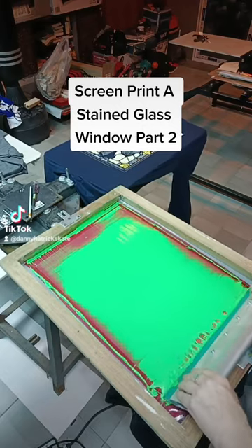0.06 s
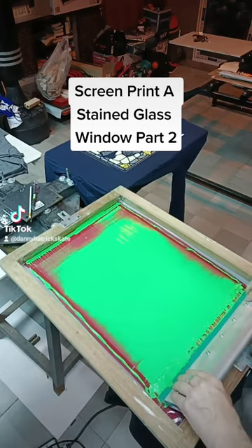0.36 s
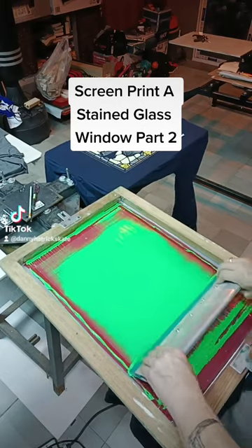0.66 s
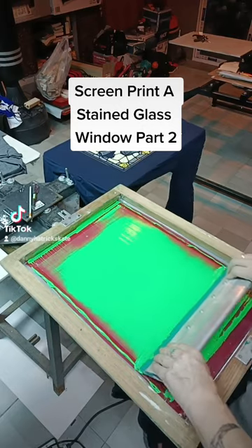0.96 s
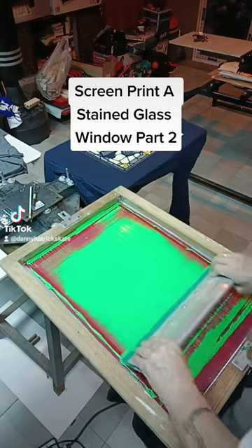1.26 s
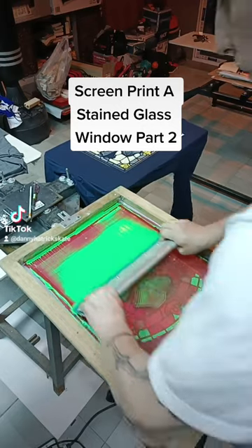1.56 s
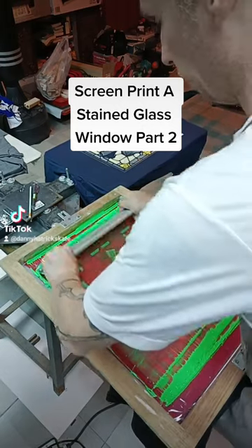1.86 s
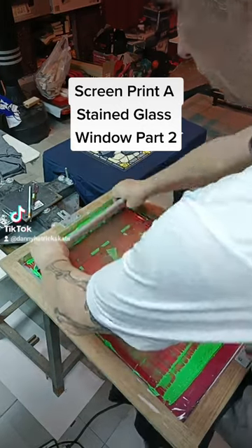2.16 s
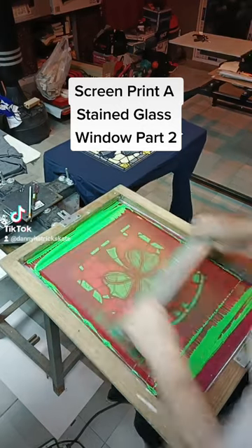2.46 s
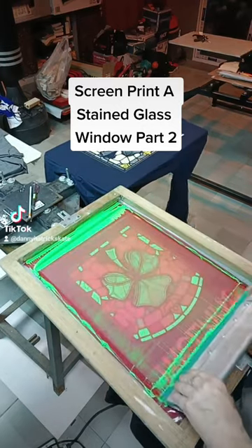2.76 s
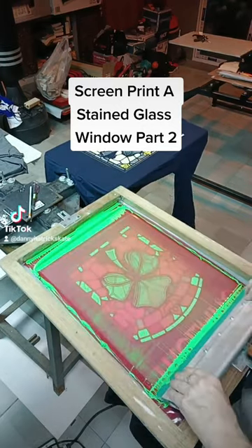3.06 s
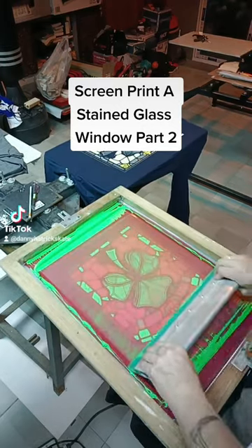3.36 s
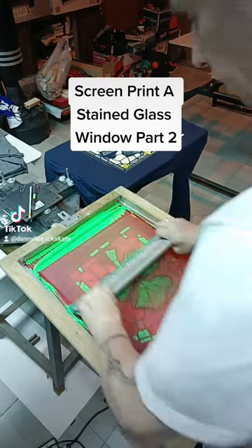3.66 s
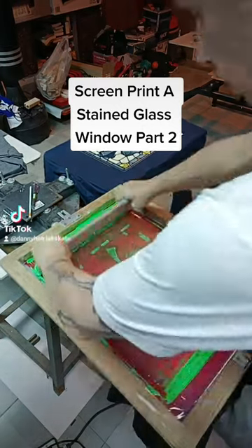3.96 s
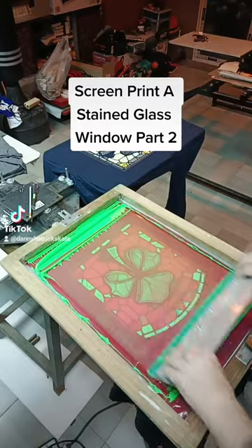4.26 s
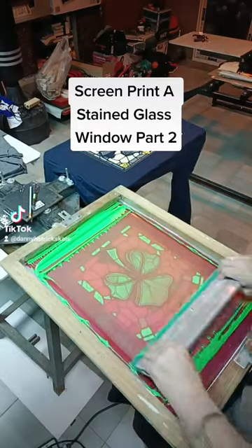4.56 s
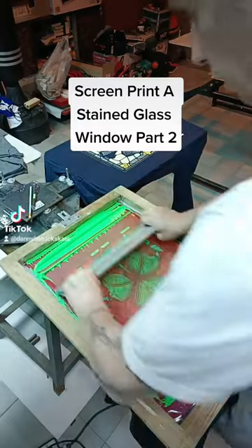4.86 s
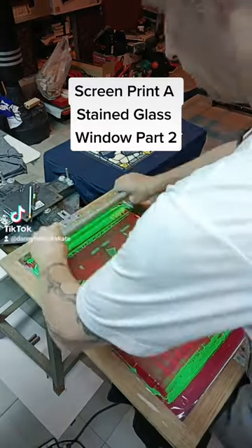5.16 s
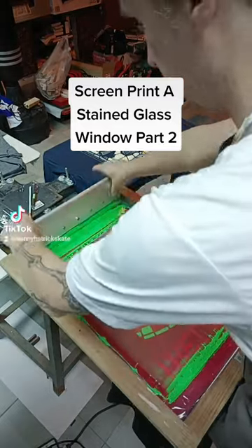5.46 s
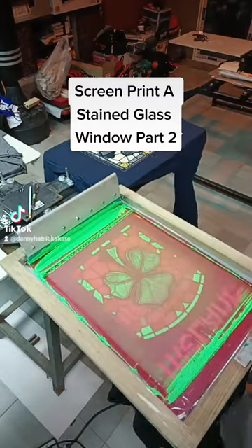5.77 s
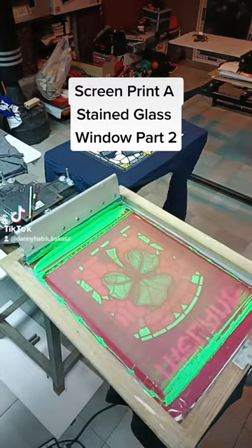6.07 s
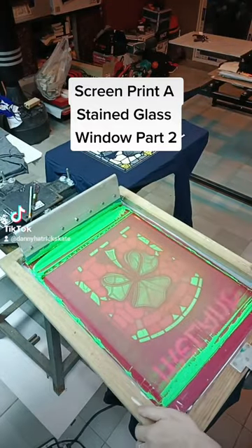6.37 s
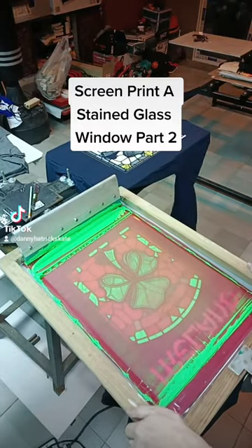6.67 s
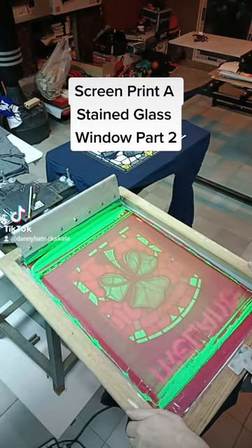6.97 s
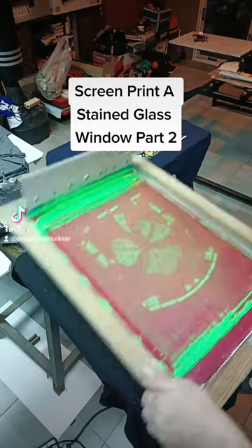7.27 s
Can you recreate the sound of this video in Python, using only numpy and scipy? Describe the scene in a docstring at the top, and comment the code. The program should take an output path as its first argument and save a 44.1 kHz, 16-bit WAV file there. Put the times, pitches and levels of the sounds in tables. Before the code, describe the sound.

A squeegee zips and rasps across an inked printing screen, with wet crackles and wooden knocks over a low ventilation drone.

```python
"""Squeegee on a printing screen

A workshop, with a phone's stereo microphone by the inked screen: short scuffs, four brief rubs, three
long pulls. The blade edge plucks the mesh threads, so each stroke zips at a pitch that follows its
speed, while wet ink crackles and snaps. The blade peels off and knocks on the wooden frame, its metal
holder ticks and the screen thuds softly. Ventilation drones in the background."""
import sys
import numpy as np
from scipy import signal
from scipy.fft import rfft, irfft
from scipy.io import wavfile
from scipy.ndimage import uniform_filter1d, map_coordinates

SR = 44100
rng = np.random.default_rng(int(sys.argv[2]) if len(sys.argv) > 2 else 0)


def dump_mix(stems):
    """Bounce the given channels to the path in sys.argv[1] as a 16-bit WAV at rate SR."""
    frames = np.atleast_2d(stems).T  # one column per channel
    limited = np.clip(frames, -1, 1)  # hard clip at full scale
    pcm = np.round(limited * 32767).astype(np.int16)
    wavfile.write(sys.argv[1], SR, pcm)


N = 326340
TIME = np.arange(N) / SR
USUAL_HZ = 1670  # threads crossed per second at the usual blade speed

# spectrum of wet ink crackling: f/Hz, level/dB
INK_SPECTRUM = [(100, -36.5), (800, 4), (2500, -0.5), (4000, 0.5), (7000, -10), (9000, -23.5),
                (10300, -16.5), (11500, -35.5), (13200, -16), (15000, -22)]
# spectrum of peeling ink and of contact cracks: f/Hz, level/dB
CRACK_SPECTRUM = [(30, -32.5), (100, -8), (1000, -1), (2300, -2.5), (3300, 3), (4200, -1.5), (6500, -13.5),
                  (9000, -32), (15000, -41.5)]


def undb(db):
    """Decibels to gain."""
    return 10 ** (np.asarray(db) / 20)


def unit(x):
    """Scale to rms 1."""
    return x / np.sqrt(np.mean(x ** 2))


def colour(x, points, size=8192):
    """Filter by an outline (f/Hz, level/dB), with minimum phase so that attacks stay sharp."""
    hz, db = np.transpose(points)
    bin_hz = np.arange(size // 2 + 1) * SR / size
    gain = undb(np.interp(np.log(bin_hz + 1), np.log(hz), db))
    cepstrum = irfft(np.log(gain))
    cepstrum[1:size // 2] *= 2
    cepstrum[size // 2 + 1:] = 0
    response = irfft(np.exp(rfft(cepstrum)))
    return signal.oaconvolve(x, np.array(response, ndmin=x.ndim), axes=-1)[..., :x.shape[-1]]


def walk(rate, size, order=16):
    """Smooth random wander of spread about 1, with rate new values a second."""
    samples = np.arange(0, size + order, order)
    coarse = map_coordinates(rng.standard_normal(len(samples)), [samples * rate / SR], order=3, mode="wrap")
    return np.interp(np.arange(size), samples, coarse)


def add(track, s, sound):
    """Mix a sound into a stereo track at time s."""
    start = int(s * SR)
    sound, start = sound[..., max(-start, 0):], max(start, 0)
    track[:, start:start + sound.shape[-1]] += sound[..., :N - start]


def swell(rise_s, fall_s, fade_db=18, roundness=1.32):
    """Time from the peak, and gain, of a gesture that is fade_db down at -rise_s and at fall_s."""
    t = np.arange(-2 * rise_s, 2 * fall_s, 1 / SR)
    return t, undb(-fade_db * np.maximum(-t / rise_s, t / fall_s) ** roundness)


def port_lag(hz, lag_s=0.000367):
    """Cycles by which the left microphone port lags: almost none in the bass, levelling off in the treble."""
    return np.array([[lag_s], [0]]) * np.minimum(hz, 4600) * np.minimum(hz / 2500, 1) ** 1.48


def burst(envelope, points, scatter=1.67):
    """Shaped noise at the microphone: a direct part, and a part scattered differently to each port."""
    size = len(envelope)
    hz = np.arange(size // 2 + 1) * SR / size
    source = envelope * rng.standard_normal(size)
    direct = irfft(rfft(source) * np.exp(-2j * np.pi * port_lag(hz)), size)
    scattered = scatter * envelope * rng.standard_normal((2, size))
    return colour(direct + scattered, points)


def crackle(points, spread_db, size):
    """Dense tiny ruptures, a few much larger than the rest."""
    strength = undb(spread_db * np.minimum(rng.exponential(size=size), 7))
    return unit(burst(strength, points))


def ventilation(drone_db=-49, air_db=-60):
    """Room tone: a low ventilation drone, partly alike at both ports, under diffuse air noise."""
    # spectra of the drone and of the air: f/Hz, level/dB
    drone_spectrum = [(20, -32), (60, -15), (105, -7.5), (138, 1.5), (182, 5), (230, 8.5), (275, -4),
                      (330, -4.5), (400, -10), (550, -16.5), (900, -39), (3000, -79.5)]
    air_spectrum = [(40, -22.5), (300, 4.5), (800, 5.5), (1700, -5.5), (3200, -9.5), (4500, -25.5),
                    (7000, -34.5), (11500, -50), (12800, -32), (15000, -31.5)]
    common = rng.standard_normal(N)
    diffuse = colour(rng.standard_normal((2, N)), [(50, -6.0), (150, -6.0), (300, 7.0), (600, -17.5)])
    drone = unit(colour(common + diffuse, drone_spectrum))
    air = unit(colour(rng.standard_normal((2, N)), air_spectrum))
    return drone * undb(drone_db + 1.76 * walk(6, N)) + air * undb(air_db)


def frame_knocks(track):
    """The squeegee knocks on the wooden frame: a contact crack and a short ring."""
    # knocks: t/s, level/dB, crack gain/dB
    knocks = [(.002, -52.5, -12), (3.497, -48, 2), (4.082, -42, 5.5), (5.263, -49.5, 14.5),
              (5.488, -41, -16)]
    # modes of frame and squeegee: f/Hz, level/dB, t60/s
    modes = [(392, 10, 0.0069), (800, -6, 0.038), (1053, 13, 0.0094), (1450, 0.5, 0.018)]
    t = TIME[:SR // 5]
    ring = sum(undb(db) * np.sin(2 * np.pi * hz * t) * undb(-60 * t / t60) for hz, db, t60 in modes)
    contact = 1 - np.exp(-t / 0.00098)  # wood and rubber meet softly
    for s, db, crack_db in knocks:
        crack = burst(np.exp(-t / 0.0033), CRACK_SPECTRUM)
        add(track, s, undb(db) * contact * (1.73 * ring + 3.0 * undb(crack_db) * crack))


def mesh_zip(t, hz, skew_hz, second_db, rasp_db, trail_s, flicker_hz, third_db=-24.0, patches=7):
    """Patches along the blade cross the threads at slightly different speeds and sum to a rough whistle."""
    # spectrum of the rubber's rasp: f/Hz, level/dB
    rasp_spectrum = [(150, -14.5), (450, -3), (780, 2), (1500, 1), (2400, -5.5), (3400, -7), (4300, -29.5),
                     (7000, -41.5), (15000, -61.5)]
    # resonances of the stretched screen: f/Hz, level/dB
    screen_response = [(640, -0.5), (785, 0.5), (920, -3.5), (1070, 3.5), (1280, -4), (1750, 3), (2700, -4),
                       (3200, 0.5), (4000, -1.5)]
    n, whistle = len(t), 0
    octaves_per_s = np.abs(uniform_filter1d(np.gradient(np.log2(hz)) * SR, SR // 20))
    skid = np.minimum(octaves_per_s / 11.5, 1)  # the blade skids as it speeds up or brakes
    skid_db = 2 * skid  # it then rasps more and plucks less cleanly
    for place in np.linspace(-1, 1, patches):
        # one end of the blade trails the other, so the whistle turns raspy whenever the speed changes
        rate = np.interp(t + trail_s * place, t, hz) + skew_hz * place + 45 * walk(500, n)
        cycles = np.cumsum(rate) / SR
        # each patch has its own path to the two ports, which matters less for low tones
        path = 0.3 * np.minimum(rate / USUAL_HZ, 1) * np.array([walk(24.91, n) for _ in range(2)])
        for k, db in enumerate((0, second_db - skid_db, third_db), 1):
            gain = undb(db) / np.sqrt(1 + (k * rate / 4000) ** 8)  # soft rubber dulls the high partials
            phase = k * cycles - port_lag(k * rate) + path + rng.random()
            whistle = whistle + gain * walk(flicker_hz, n) * np.sin(2 * np.pi * phase)
    chatter = 1 + 0.32 * skid * walk(446.2, n)  # smears each partial into a rough band
    rasp = undb(rasp_db + skid_db) * (USUAL_HZ / hz) ** 0.15 * crackle(rasp_spectrum, 1.6, n)
    rub = unit(whistle * chatter) + rasp
    power = uniform_filter1d(np.mean(rub ** 2, axis=0), SR // 60)
    steady = rub / np.sqrt(power)  # the hand keeps the pressure steady
    grip = undb(1.6 * walk(134.6, n))
    return colour(steady, screen_response) * grip


def wet_ink(size, breaks_per_s=55, break_s=0.00057):
    """Wet ink crackles under the blade; now and then a larger string of ink breaks."""
    hiss = crackle(INK_SPECTRUM, 2.6, size) * undb(2.9 * walk(120, size))
    breaks = (rng.random(size) < breaks_per_s / SR) * rng.uniform(0.15, 1, size)
    ticks = signal.lfilter([1], [1, -np.exp(-1 / (break_s * SR))], breaks)
    return hiss * (1 + 3.0 * ticks)


def blade_scuffs(track, bend_s=0.04):
    """Short raspy strokes with the blade askew; the pitch bends as the hand speeds up or slows down."""
    # scuffs: peak t/s, rise/s, fall/s, f/Hz, bend each side of f/octaves, spread along the blade/Hz,
    # second partial/dB, zip level/dB, rasp/dB, ink hiss/dB
    scuffs = [ (0.008, 0.016, 0.038, 379, 0.13, 119.3, 0.5, -42.5, -12.5, -89),
              (0.04, 0.019, 0.034, 1228, 0.18, 40, -3.5, -41.5, -8.5, -71),
              (0.37, 0.038, 0.036, 1378, -0.4, 132, -8, -41.5, -5.5, -61.5),
              (0.54, 0.055, 0.15, 749, 0.05, 119.7, -24, -54.5, -4, -76),
              (1.094, 0.015, 0.048, 1612, -0.7, 37.3, 0, -40, -31, -55),
              (1.255, 0.017, 0.04, 1570, -0.15, 35, 0.5, -32.5, -21.5, -60),
              (2.885, 0.055, 0.13, 903, -0.22, 109.8, -6.5, -50, -8.5, -72),
              (3.2, 0.019, 0.063, 938, 0.09, 200.5, -12, -43.5, -6, -69), ]
    for s, rise_s, fall_s, hz, bend, skew_hz, second_db, zip_db, rasp_db, ink_db in scuffs:
        t, gain = swell(rise_s, fall_s)
        pitch = hz * 2 ** (bend * np.tanh(t / bend_s))
        mesh = mesh_zip(t, pitch, skew_hz, second_db, rasp_db, trail_s=0.0072, flicker_hz=161.0)
        add(track, s + t[0], gain * (undb(zip_db) * mesh + undb(ink_db) * wet_ink(len(t))))


def blade_pulls(track, ink_db_per_octave=7.5):
    """Rubs and long pulls with the blade square on: the mesh zips, and a faster blade tears more ink."""
    # one list of points per stroke: t/s, thread-crossing f/Hz, zip level/dB
    pulls = [
        [(0.241, 1406, -54), (0.262, 1843, -42.5), (0.277, 1889, -33.5), (0.298, 1530, -41.5),
         (0.318, 1750, -47), (0.35, 1535, -56)],
        [(0.605, 782, -50.5), (0.626, 891, -44.5), (0.643, 1153, -42.5), (0.668, 1076, -45), (0.69, 965, -37),
         (0.72, 694, -41.5), (0.752, 894, -41), (0.772, 720, -67)],
        [(1.232, 798, -42.5), (1.272, 1407, -44), (1.322, 1289, -41), (1.336, 1009, -37.5), (1.394, 1689, -43),
         (1.43, 1465, -49.5), (1.49, 1389, -41.5), (1.547, 1300, -49.5), (1.61, 1721, -42.5),
         (1.655, 1470, -40.5), (1.722, 1441, -35.5), (1.78, 1493, -42.5), (1.826, 1606, -39.5),
         (1.892, 1381, -40.5), (1.935, 1475, -43), (1.968, 1202, -39.5), (2.014, 972, -42.5),
         (2.044, 673, -48.5)],
        [(2.293, 941, -47), (2.319, 1046, -34.5), (2.332, 1124, -31.5), (2.342, 1450, -29), (2.364, 1495, -38),
         (2.383, 1478, -46), (2.436, 1567, -67)],
        [(3.277, 960.6, -52), (3.294, 942, -40), (3.33, 790, -41.5), (3.366, 783, -42.5), (3.383, 990, -39),
         (3.439, 842, -50.5)],
        [(3.5, 1282, -53), (3.595, 1728, -51), (3.656, 1670, -48.5), (3.695, 1893, -48.5), (3.76, 1777, -46),
         (3.82, 2129, -40), (3.882, 2158, -40), (3.953, 1700, -41.5), (3.974, 1102, -40), (4.002, 832, -32.5),
         (4.04, 722.5, -50)],
        [(4.55, 625, -45.5), (4.597, 1021, -36), (4.606, 1035, -28), (4.622, 1150, -39), (4.69, 1333, -36.5),
         (4.725, 1834, -36), (4.75, 2290, -33.5), (4.778, 2485, -39), (4.828, 2290, -42.5), (4.88, 2508, -38),
         (4.916, 2304, -40.5), (4.948, 2555, -37.5), (4.984, 2350, -43.5), (5.026, 1796, -30),
         (5.06, 1336, -35), (5.115, 1057, -36), (5.134, 810, -34), (5.15, 812, -46.5), (5.184, 795, -57)],
    ]
    # how the blade bears on each: spread along it/Hz, second partial/dB, rasp/dB, hiss at usual speed/dB
    pressures = [(60, -10, -9.5, -71.5), (75.06, -8, -15, -63.5), (21.99, -8, -19.5, -63.5),
                 (39.6, -10, -9.5, -63.5), (60, -11.5, -16.5, -67), (21.99, -6, -21, -64),
                 (27.92, -10.5, -24, -62)]
    for points, (skew_hz, second_db, rasp_db, ink_db) in zip(pulls, pressures):
        s, hz, db = np.transpose(points)
        t = np.arange(s[0], s[-1], 1 / SR)
        judder = 1 + 0.0116 * walk(28.21, len(t))  # the rubber catches and slips
        pitch = np.interp(t, s, hz) * judder
        mesh = mesh_zip(t, pitch, skew_hz, second_db, rasp_db, trail_s=0.014, flicker_hz=124.8)
        hiss = wet_ink(len(t)) * undb(ink_db + ink_db_per_octave * np.log2(pitch / USUAL_HZ))
        contact = np.clip(np.minimum(t - s[0], s[-1] - t) / 0.0024, 0, 1)
        add(track, s[0], contact * (mesh * undb(np.interp(t, s, db)) + hiss))


def bubble_snaps(track, pivot_hz=5960):
    """Ink bubbles snap, each over in a few milliseconds; smaller ones are brighter."""
    # snaps: t/s, level/dB, tilt about the pivot/(dB per octave)
    snaps = [(0.728, -32, 7.5), (1.4606, -31, 1.5), (1.8218, -31.5, 0.5), (1.8901, -35, 3),
             (1.9734, -27.5, -2.5), (2.815, -46.5, -1), (3.031, -39.5, 2), (3.392, -44, 11),
             (3.493, -36, 0), (3.643, -29.5, 0.5), (3.6737, -33.5, -2), (3.777, -32.5, -1),
             (3.9885, -36.5, -4.5), (4.054, -34.5, 2.5), (4.638, -38, 9), (4.8, -28.5, 0),
             (4.862, -30.5, 0), (4.935, -33, -1.5), (5.0685, -35, 0), (5.1591, -37.5, 5),
             (5.1937, -30.5, 1.5)]
    t = TIME[:SR // 30]
    envelope = np.minimum(t / 0.0023, 1) * (np.exp(-t / 0.0011) + 0.16 * np.exp(-t / 0.0082))
    for s, db, tilt in snaps:
        spectrum = [(hz, level + tilt * np.log2(hz / pivot_hz)) for hz, level in INK_SPECTRUM]
        add(track, s, undb(db) * burst(envelope, spectrum))


def ink_peels(track):
    """Strings of sticky ink tear as the blade or the mesh lifts."""
    # peels: peak t/s, rise/s, fall/s, level/dB
    peels = [(1.102, 0.0092, 0.093, -51), (4.08, 0.028, 0.018, -44.5), (5.196, .007, 0.11, -43),
             (7.13, 0.069, 0.13, -72.5)]
    for s, rise_s, fall_s, db in peels:
        t, gain = swell(rise_s, fall_s)
        tearing = crackle(CRACK_SPECTRUM, 0.65, len(t))
        add(track, s + t[0], tearing * gain * undb(db + 1.2 * walk(148, len(t))))


def screen_thuds(track):
    """The whole screen thuds softly as weight lands on it or leaves it, alike at both ports."""
    # thuds: peak t/s, level/dB
    thuds = [(1.111, -54), (2.305, -58), (5.917, -55), (6.29, -53), (6.801, -50.5)]
    # their dull spectrum: f/Hz, level/dB
    spectrum = [(25, -13), (60, -5), (110, -2.5), (200, 9.5), (330, 1.5), (600, -22), (2500, -84)]
    t, gain = swell(rise_s=0.021, fall_s=0.069)
    for s, db in thuds:
        push = unit(colour(rng.standard_normal(len(t)), spectrum))
        add(track, s + t[0], undb(db) * gain * push)


def ink_beads(track):
    """The blade squelches through thick beads of ink, each a brief surge of crackle."""
    # beads: peak t/s, level/dB
    beads = [(1.305, -50), (1.485, -55.5), (1.832, -65), (1.895, -54), (1.962, -51.5), (3.404, -58.5),
             (3.61, -53.5), (3.81, -64), (3.925, -56), (4.657, -58), (4.87, -54.5)]
    t, gain = swell(rise_s=0.047, fall_s=0.053)
    for s, db in beads:
        add(track, s + t[0], undb(db) * gain * wet_ink(len(t)))


def holder_ticks(track, t60_s=0.022, crack_db=-8):
    """The metal holder ticks with one short ring as the grip changes."""
    # ticks: t/s, f/Hz, level/dB
    ticks = [(3.03, 5770, -54), (3.079, 3160, -39)]
    t = TIME[:SR // 10]
    attack = 1 - np.exp(-t / 0.00053)
    for s, hz, db in ticks:
        ring = np.sin(2 * np.pi * hz * t) * undb(-60 * t / t60_s)
        crack = undb(crack_db) * burst(np.exp(-t / 0.0088), CRACK_SPECTRUM)
        add(track, s, undb(db) * attack * (ring + crack))


def room(x, t60_s=0.14, tail_db=-8.5):
    """A short tail from the cluttered room; the microphone's left port is shaded from the screen."""
    t = TIME[:SR // 2]
    tail = rng.standard_normal((2, len(t))) * undb(-60 * t / t60_s) * (t > .005)
    reverb = signal.fftconvolve(x, unit(tail) / np.sqrt(len(t)), axes=1)[:, :N]
    left, right = x + undb(tail_db) * reverb
    left = colour(left, [(400, 6.5), (1100, -1.1), (2100, -4.0), (5000, -6.0), (7000, 1), (9000, 1.5)])
    right = colour(right, [(400, 5.0), (1100, 1.0), (2600, 1.0), (4500, -1.3), (9000, 1.5)])
    return np.array([left, right])


def scene():
    """The work on the screen in the foreground, the workshop's room tone behind."""
    screen = np.zeros((2, N))
    blade_pulls(screen)
    blade_scuffs(screen)
    ink_beads(screen)
    ink_peels(screen)
    screen_thuds(screen)
    bubble_snaps(screen)
    holder_ticks(screen)
    frame_knocks(screen)
    return room(screen) + ventilation()


def record(dry):
    """The phone cuts the top steeply."""
    top_hz = 15250
    return signal.sosfilt(signal.ellip(8, .2, 70, top_hz, fs=SR, output="sos"), dry)


dry = scene()
out = record(dry)
dump_mix(out)
```